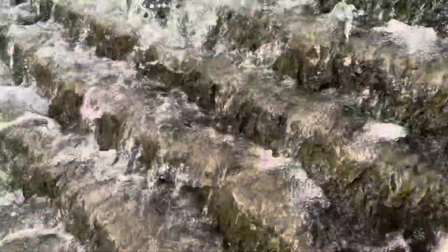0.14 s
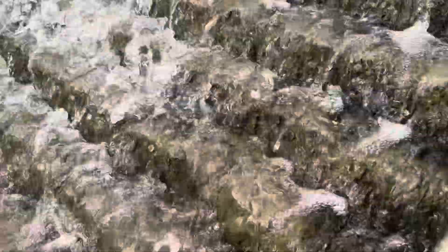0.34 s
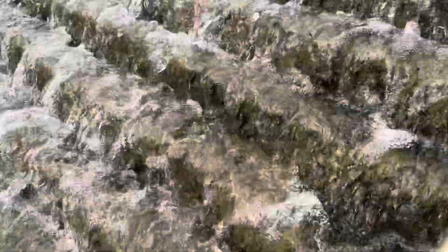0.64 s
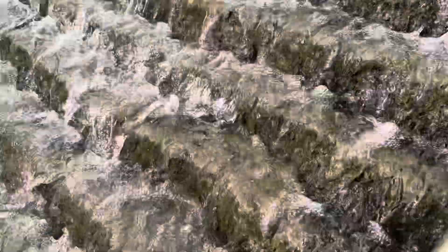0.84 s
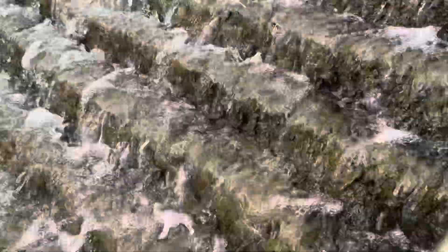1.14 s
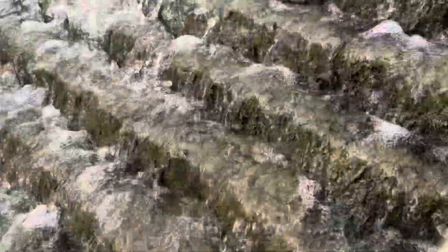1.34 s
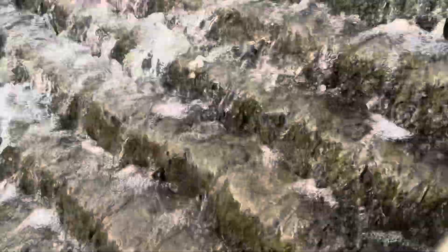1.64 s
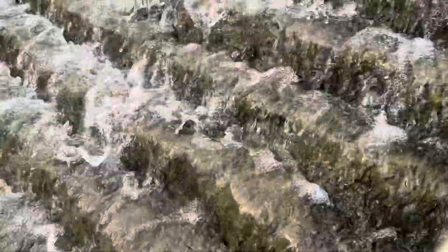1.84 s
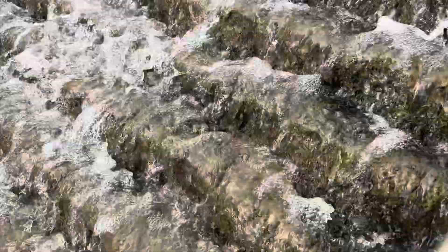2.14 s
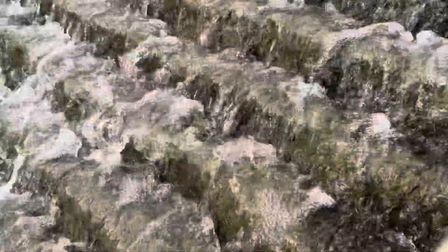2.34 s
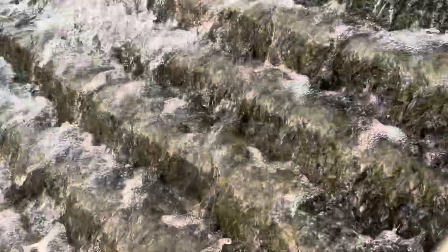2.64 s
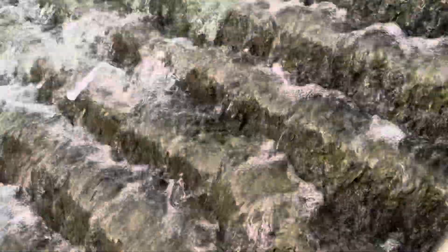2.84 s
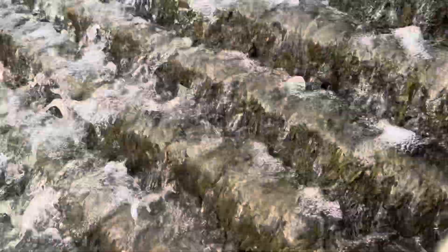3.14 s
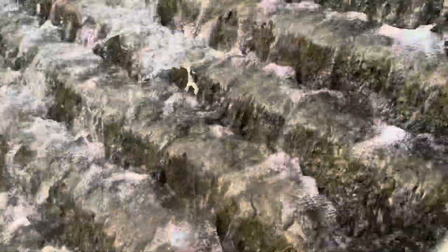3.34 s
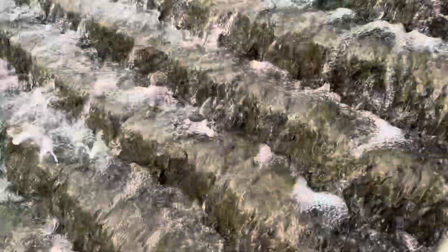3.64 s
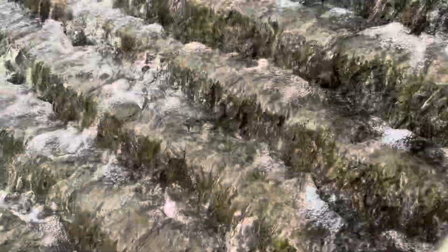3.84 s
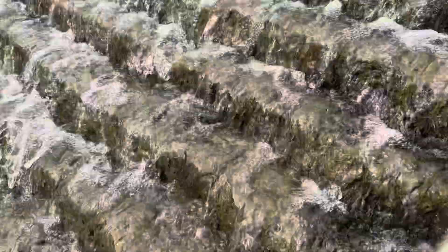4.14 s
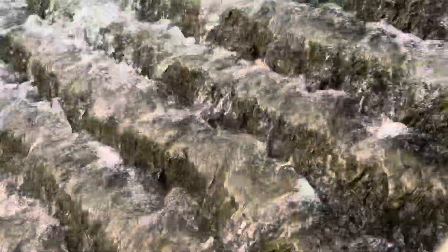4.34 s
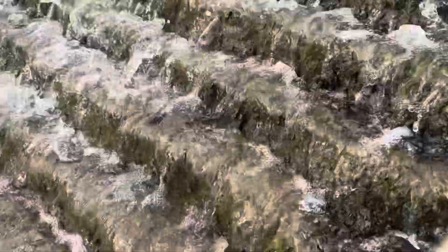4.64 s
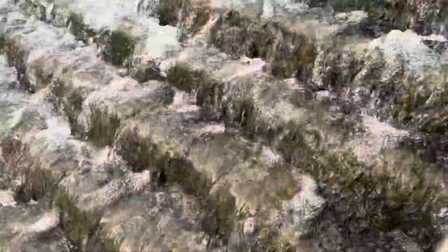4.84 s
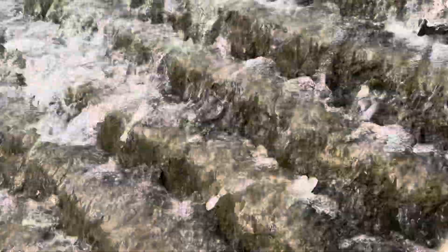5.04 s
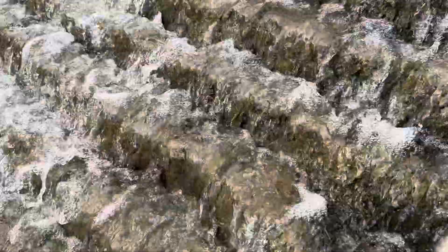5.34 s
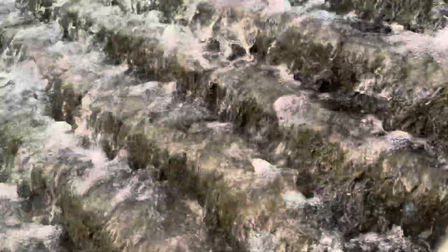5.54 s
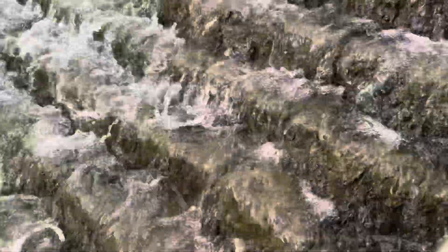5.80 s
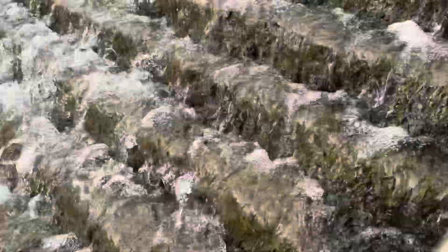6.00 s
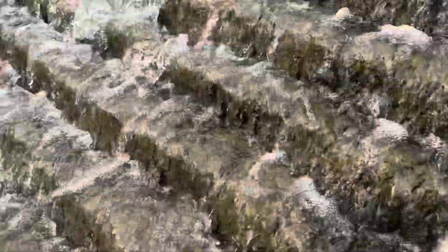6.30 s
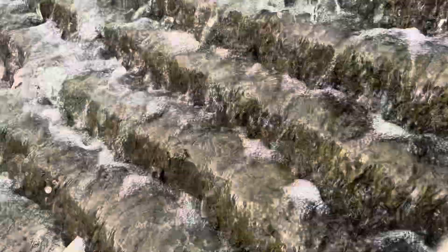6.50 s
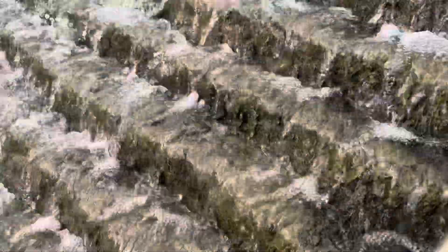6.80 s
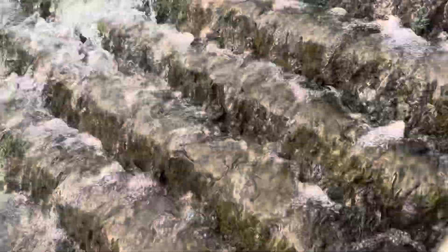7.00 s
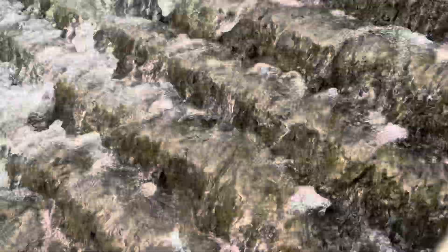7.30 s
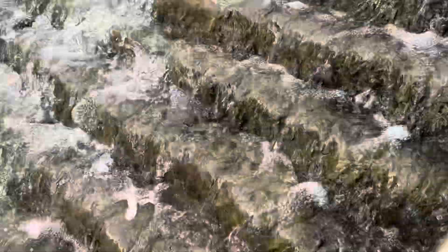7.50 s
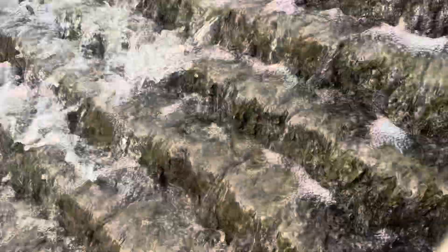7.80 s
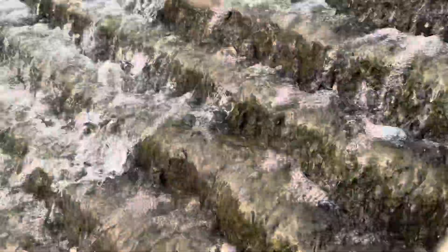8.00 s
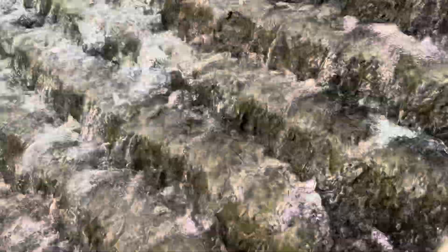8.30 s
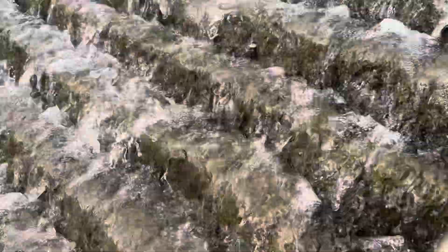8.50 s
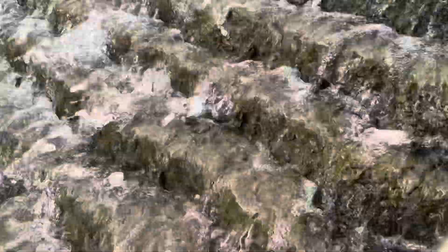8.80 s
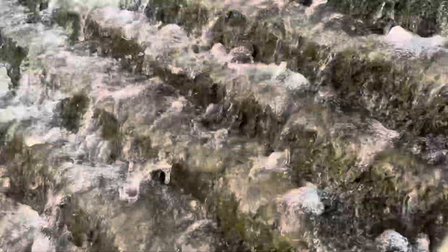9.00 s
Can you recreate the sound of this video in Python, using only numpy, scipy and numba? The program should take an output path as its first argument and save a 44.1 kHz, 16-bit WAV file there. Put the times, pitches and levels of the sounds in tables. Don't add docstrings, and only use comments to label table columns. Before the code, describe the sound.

Outdoors, close to a handheld stereo microphone, a stream tumbles without pause over rock ledges. A dense, even mid-low roar carries a softer fizz of spray, swelling slightly in quick irregular slaps. Individual bubbles gurgle, gulp and plip within it, and tiny droplets tick on rock. Light breeze rumbles underneath, with a few soft thumps on the microphone, mostly from two to three and a half seconds and again near six.

```python
import sys
import numpy as np
from scipy import signal
from scipy.fft import rfft, irfft, next_fast_len
from scipy.io import wavfile
from scipy.ndimage import uniform_filter1d, map_coordinates
from numba import njit

SR = 44100
rng = np.random.default_rng(int(sys.argv[2]) if len(sys.argv) > 2 else 0)


def int16_out(signal):
    q = np.round(np.clip(np.atleast_2d(signal).T, -1, 1) * 32767)
    wavfile.write(sys.argv[1], SR, q.astype(np.int16))


def voltage_ratio(decibels):
    exponent = np.asarray(decibels, float) / 20
    return 10 ** exponent


N = 403515

# time in seconds, level in dB.
WATER_FLOW = [(0.0, -23.5), (1.96, -23), (3.97, -23.5), (4.99, -23), (6.32, -23.5), (6.6, -24), (9.15, -23)]
# peak time in seconds, swell in dB.
SURGES = [(0.0, 5.5), (1.91, 1), (4.15, 0), (4.53, 2), (4.64, -1.5), (4.99, 2.5), (5.22, 2), (5.99, 4),
          (6.12, 0.5), (6.68, 3), (6.86, 1), (7.54, 1), (7.77, 3), (7.98, 3.5), (8.33, 2)]
# frequency in Hz, level in dB per Hz.
WATER_COLOUR = [(180, -7.5), (310, 1), (450, 2), (680, -2.5), (1000, -4.5), (1580, -6.5), (1850, -9.5),
                (2900, -14), (4500, -17), (7200, -20), (8800, -16), (10700, -15), (12000, -15.5),
                (14000, -17)]
# time in seconds, level in dB.
BREEZE = [(0, -54.5), (1.6, -53), (2.3, -49), (3.3, -44), (4.3, -51.5), (5.0, -52.5), (7.0, -54),
          (7.6, -53.5), (9.15, -58)]
# peak time in seconds, peak level in dB.
EDDIES = [(0.15, -48), (0.38, -48), (0.69, -38), (1.2, -37), (1.55, -55), (1.88, -38), (2.09, -47),
          (2.29, -27), (2.39, -37), (2.57, -39), (2.75, -32), (2.93, -34), (3.08, -33), (3.21, -41),
          (3.34, -42), (3.77, -39), (4.13, -42.5), (4.38, -35), (4.56, -46), (4.71, -41), (5.27, -38),
          (5.68, -32), (6.01, -29), (6.42, -46), (6.75, -45), (6.93, -49), (7.06, -43), (7.18, -50)]
# frequency in Hz, level in dB per Hz.
BUFFET_COLOUR = [(13, -39), (25, -10), (54, 3), (78, 0), (168, -10), (220, -11.5), (290, -38), (480, -120)]
# start in seconds, peak level in dB, pitch in Hz.
GURGLES = [(1.249, -16.5, 233), (1.607, -34, 268), (1.721, -32, 299), (1.893, -33, 288), (2.124, -21, 277),
           (2.98, -15, 284), (4.545, -18.5, 210), (4.75, -20, 246), (4.833, -25, 205), (5.698, -16.5, 270),
           (5.854, -18, 260), (6.675, -34, 266), (6.921, -20, 283), (7.514, -16.5, 234), (8.723, -24, 226)]
# start in seconds, peak level in dB, pitch in Hz.
GULPS = [(0.217, -7, 410), (0.383, -10, 603), (0.662, -9, 417), (0.875, -2, 1250), (1.048, -5, 510),
         (1.207, -2.5, 1540), (1.444, -6, 1010), (2.075, -7, 1480), (2.112, -8, 493), (2.233, -8, 507),
         (2.263, -12, 390), (2.65, -9, 500), (3.804, -8, 467), (3.853, -7.5, 386), (4.635, -4, 528),
         (5.144, -5, 1120), (5.684, -5, 426), (6.041, -8, 443), (6.084, -9, 536), (6.669, -9, 254),
         (6.849, -19, 423), (6.9, -9, 385), (7.523, -5, 408), (7.637, -4.5, 600), (7.857, -15, 564),
         (7.964, -4, 470), (8.194, -4.5, 670), (8.237, -4.5, 360), (8.753, -4, 1450), (9.087, -9, 630)]
# start in seconds, peak level in dB, pitch in Hz.
PLIPS = [(0.1211, -17, 2220), (0.1535, -6, 2310), (1.3443, -2, 2200), (1.4182, -9, 2430),
         (1.725, -18, 2020), (1.8572, -19, 2000), (1.919, -4, 2280), (2.5765, -6, 2770), (3.026, -7, 2650),
         (3.253, -13, 2680), (3.3293, -7, 2330), (3.5758, -13, 2060), (3.7728, -11, 2640),
         (4.0317, -5, 2040), (4.0771, -18, 2000), (4.1126, -19, 2370), (4.2827, -5, 2280),
         (5.145, -3, 1510), (5.217, -14.5, 2170), (7.3996, -7, 2120), (7.6705, -20, 2260),
         (7.7263, -7, 2580), (7.7538, -6, 2380), (7.8885, -9, 2330), (8.0162, -18, 2530),
         (8.3135, -11, 2540), (8.6073, -17, 2150), (9.0713, -4, 2430)]
# start in seconds, peak level in dB, pitch in Hz.
DROPLETS = [(0.4399, -13, 11000), (0.4564, -15, 11100), (0.6888, -11, 11300), (2.1106, -9, 14300),
            (2.2613, -7, 10800), (2.6883, -16, 10600), (2.8174, -18, 11100), (3.6224, -18, 10800),
            (3.8536, -9, 11100), (3.9649, -12, 11000), (4.0976, -16, 10800), (4.7955, -17, 14000),
            (5.2195, -14, 11200), (6.1414, -15, 11100), (6.1554, -14, 13800), (6.4208, -16, 10800),
            (7.4001, -11, 14200), (7.5113, -14, 10800), (7.7543, -16, 14200), (7.9174, -15, 14000),
            (8.2342, -16, 14100), (8.7226, -16, 11000), (8.9845, -12, 13400)]
# start in seconds, peak level in dB, pitch in Hz.
GUST_BLOWS = [
    (2.267, -36, 67.3),
    (2.369, -29, 59.2),
    (2.546, -28, 46.4),
    (2.899, -34, 118),
    (3.047, -24, 79),
    (3.311, -39, 56.5),
    (4.114, -29, 53.8),
    (5.735, -31, 59.2),
    (5.992, -25, 65.4),
    (6.349, -33, 61.9),
]
# frequency in Hz, left-right likeness from 0 to 1,
# left over right in dB, right's phase lead in radians.
PORT_PAIR = [(50, .72, -.4, -.18), (130, 0.63, -1.4, -0.67), (280, 0.87, 0.3, -0.16),
             (500, 0.83, 2.0, -0.35), (850, 0.67, 3.2, 0.1), (1450, 0.64, 1.5, 0.05),
             (1800, 0.24, 3.9, 0.42), (2100, 0.46, 4.6, 0.78), (2600, 0.68, 3.3, 0.1),
             (3400, 0.73, 2.7, -0.87), (4500, 0.78, 2.7, -0.24), (5900, 0.94, 0.5, -0.04),
             (7000, 0.84, 1.4, 0.14), (7800, 0.99, 0.1, -0.01)]

CROSS_HZ, LAG_S = 2.51 * SR / 14, 14 / SR


def unit(x):
    return x / np.sqrt(np.mean(x ** 2) + 1e-20)


def along(points, hz, axis=1):
    rows = np.transpose(points)
    return np.interp(np.log(hz + 1), np.log(rows[0] + 1), rows[axis])


def level_curve(points):
    s, db = np.transpose(points)
    return np.interp(np.arange(N) / SR, s, db)


def wobble(rate):
    return map_coordinates(rng.standard_normal(1000), [np.arange(N) * rate / SR])


def humps(s, size, width_s):
    t = np.arange(0, N + 64, 64) / SR
    bells = np.exp(-.5 * ((t - s[:, None]) / width_s) ** 2)
    return np.interp(np.arange(N) / SR, t, size @ bells)


def band(hz, lo_hz, hi_hz):
    return 1 / np.sqrt((1 + (lo_hz / (hz + 1)) ** 4) * (1 + (hz / hi_hz) ** 4))


def filtered(x, response):
    m = next_fast_len(N + 8192)
    return irfft(rfft(x, m) * response(np.fft.rfftfreq(m, 1 / SR)), m)[..., :N]


def rush(patchy_db, wide, long):
    z = signal.stft(rng.standard_normal((2, N)), nperseg=256)[2]
    field = uniform_filter1d(rng.standard_normal(z.shape[1:]), wide, 0)
    field = unit(uniform_filter1d(field, long, 1))
    return unit(signal.istft(z * voltage_ratio(patchy_db * field), nperseg=256)[1][:, :N])


@njit
def add_rings(out, start, hz, size, cycles, rise):
    for i in range(len(hz)):
        life = cycles * SR / hz[i]
        for k in range(min(int(life), len(out) - start[i])):
            u = k / life
            ring = np.sin(2 * np.pi * cycles * u * (1 + rise * u / 2))
            out[start[i] + k] += size[i] * ring * np.exp(-5 * u) * (1 - np.exp(-10 * u))


def bubbles(count, lo_hz, hi_hz, cycles, rise, spread_db):
    out = np.zeros((2, N))
    for crowd in out:
        when, pitch, luck = rng.random((count, 3)).T
        hz = lo_hz * (hi_hz / lo_hz) ** pitch
        size = hz * voltage_ratio(-spread_db * np.log(1 - .99 * luck))
        add_rings(crowd, (when * N).astype(np.int64), hz, size, cycles, rise)
    return unit(out)


def water_colour(hz):
    return voltage_ratio(along(WATER_COLOUR, hz)) * band(hz, 212, SR) ** 2


def roar():
    far = rush(patchy_db=1.5, wide=3, long=8)
    near = bubbles(count=9000, lo_hz=201.7, hi_hz=3460, cycles=14.0, rise=0.16, spread_db=3.0)
    return unit(filtered(far + voltage_ratio(-8.0) * near, lambda hz: water_colour(hz) * band(hz, 1, 2020)))


def spray():
    far = rush(patchy_db=1.3, wide=20, long=6)
    near = bubbles(count=20000, lo_hz=4486, hi_hz=14600, cycles=8.6, rise=0.12, spread_db=4.5)
    return unit(filtered(far + voltage_ratio(-6.0) * near, lambda hz: water_colour(hz) * band(hz, 1390, 9 * SR)))


def stream():
    s, swell_db = np.transpose(SURGES)
    width_s, lull_after_s, lull_share = 0.039, 0.023, 0.33
    surge_db = humps(s, swell_db, width_s) - lull_share * humps(s + lull_after_s, swell_db, width_s)
    flow_db = level_curve(WATER_FLOW)
    slosh = wobble(9)
    roar_db = flow_db - 1.5 + surge_db + 0.3 * slosh
    spray_db = flow_db - 1 + 0.24 * surge_db + 0.2 * slosh + 0.49 * wobble(35)
    return voltage_ratio(roar_db) * roar() + voltage_ratio(spray_db) * spray()


def pool():
    boil = rush(patchy_db=-1.0, wide=2, long=20)
    return voltage_ratio(-46.5) * unit(filtered(boil, lambda hz: band(hz, 110, 165) ** 2))


def wind():
    lumps = voltage_ratio(0.44 * np.array([wobble(12), wobble(8.6)]))
    rumble = filtered(rng.standard_normal((2, N)), lambda hz: voltage_ratio(along(BUFFET_COLOUR, hz)))
    s, db = np.transpose(EDDIES)
    strength = voltage_ratio(level_curve(BREEZE)) + humps(s, voltage_ratio(db - 14), width_s=0.02)
    uneven = voltage_ratio([[0], [2.5]])
    return voltage_ratio(10.0) * strength * unit(lumps * rumble) * uneven


def near_bubbles():
    out = np.zeros(N)
    for table, gain_db, cycles, rise in ((PLIPS, -3, 11.0, .15), (GULPS, -3, 14.0, .2), (GURGLES, 1.5, 18.0, .15)):
        s, db, hz = np.transpose(table)
        add_rings(out, (s * SR).astype(np.int64), hz, voltage_ratio(db + gain_db), cycles, rise)
    return out


def droplet_ticks():
    ring, crack = np.zeros(N), np.zeros(N)
    s, db, hz = np.transpose(DROPLETS)
    hit = ((s + .001) * SR).astype(np.int64)
    add_rings(ring, hit, hz, voltage_ratio(db + 5), 24.0, .03)
    t = np.arange(300) / SR
    for at, level_db in zip(hit, db):
        snap = voltage_ratio(level_db - 60 * t / .006) * (1 - np.exp(-t / .0003))
        crack[at:][:len(t)] += snap * np.sign(rng.standard_normal(len(t)))
    return ring + filtered(crack, lambda hz: band(hz, 4700, SR) ** 2)


def gust_thumps():
    out = np.zeros(N)
    s, db, hz = np.transpose(GUST_BLOWS)
    add_rings(out, ((s + 0.016) * SR).astype(np.int64), hz, voltage_ratio(db + 14.0), 4.5, -.1)
    return out


def scene():
    around = stream() + pool() + wind()
    centred = near_bubbles() + droplet_ticks() + gust_thumps()
    return around + centred * [[1], [0]]


def ports(hz):
    likeness = np.clip(along(PORT_PAIR, hz) - 0.13 * band(hz, 2900, SR), 0, 1)
    turn = np.arccos(likeness) / 2
    tilt = voltage_ratio(along(PORT_PAIR, hz, axis=2) / 2) * np.exp(-.5j * along(PORT_PAIR, hz, axis=3))
    low = np.array([[tilt * np.cos(turn), tilt * np.sin(turn)],
                    [np.cos(turn) / tilt, -np.sin(turn) / tilt]])
    half = np.pi * (hz - CROSS_HZ) * LAG_S
    alike = .8
    shared, apart = -1j * np.sin(half) * voltage_ratio(-1.5) * [[alike], [np.sqrt(1 - alike ** 2)]]
    high = [[np.cos(half) + shared, apart], [np.cos(half) - shared, -apart]]
    return np.where(hz < CROSS_HZ, low, high)


def joint(x, from_hz, under_db, moody_db, sharp):
    late = 310
    pair = np.pad([x[0] + x[1], x[0] - x[1]], ((0, 0), (late, 0)))
    hz, _, z = signal.stft(pair, SR, "cosine", nperseg=2048)
    level = (np.abs(z[:, :1024]).reshape(2, 64, 16, -1) ** 2).sum(axis=2) + 1e-20
    frames = level.shape[-1]
    mood = moody_db * uniform_filter1d(rng.uniform(-1.5, 1.5, frames), size=2)
    limit = voltage_ratio(2 * (np.reshape(under_db, (2, 1, 1)) + mood))
    edge = np.abs(np.diff(x[0], 2, prepend=np.zeros(late + 512)))
    peak = np.resize(edge, (frames, 1024)).max(axis=1)
    limit = limit * (peak < sharp * np.median(peak))
    kept = np.repeat(level > limit * level[::-1], 16, axis=1)
    z[:, :1024] *= kept | (hz[:1024, None] < from_hz)
    both, apart = signal.istft(z, SR, "cosine", nperseg=2048)[1][:, late:late + N] / 2
    return np.array([both + apart, both - apart])


def low_pass(x):
    return signal.sosfilt(signal.butter(12, 15800, fs=SR, output="sos"), x)


def record(dry):
    heard = filtered(dry[None], ports).sum(axis=1)
    heard = filtered(heard, lambda hz: band(hz, 32, 9 * SR))
    mix = joint(heard, from_hz=3500, under_db=(-3.5, -8.5), moody_db=5, sharp=1.8)
    return low_pass(mix)


dry = scene()
out = record(dry)
int16_out(out)
```